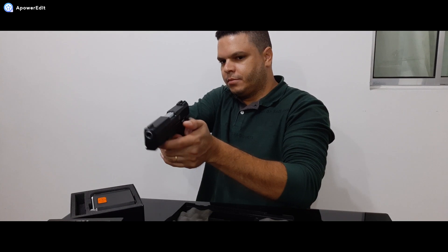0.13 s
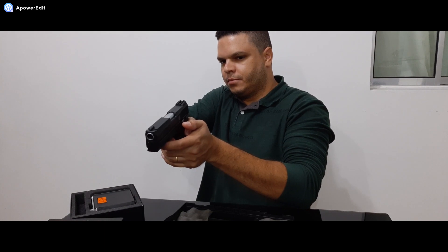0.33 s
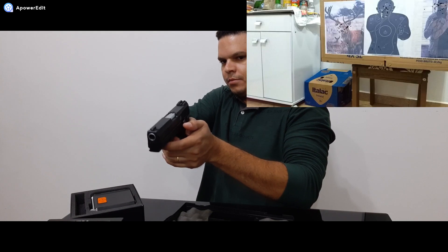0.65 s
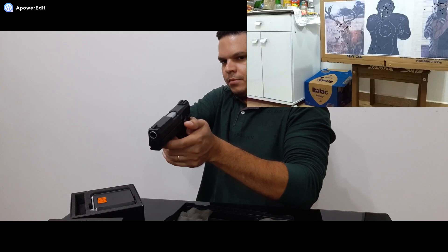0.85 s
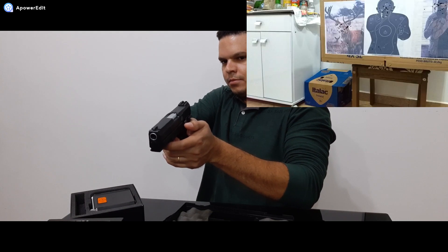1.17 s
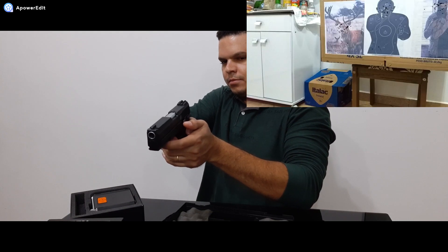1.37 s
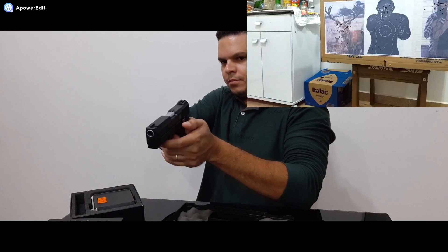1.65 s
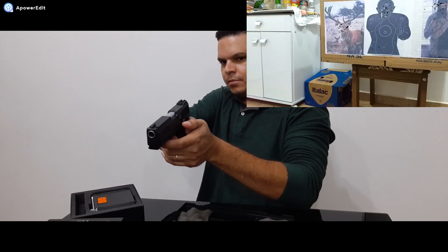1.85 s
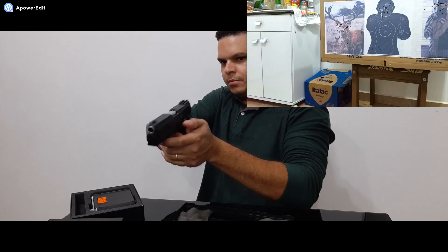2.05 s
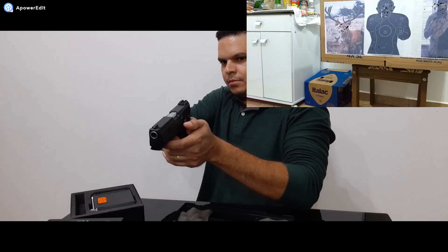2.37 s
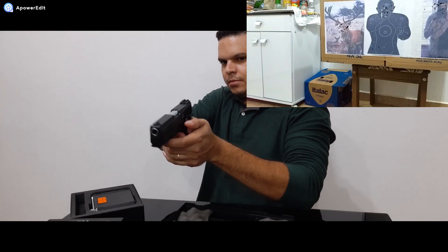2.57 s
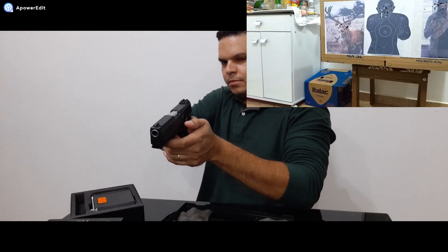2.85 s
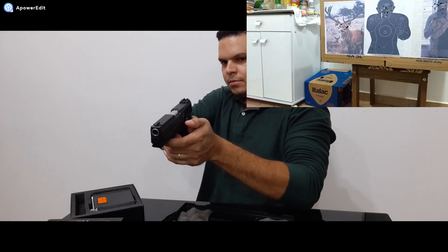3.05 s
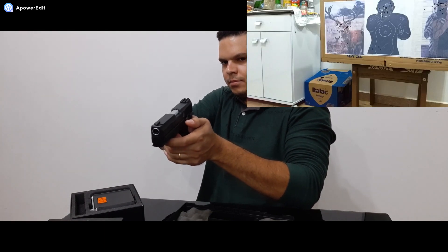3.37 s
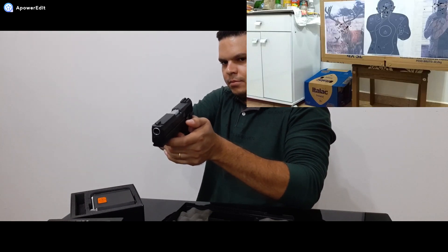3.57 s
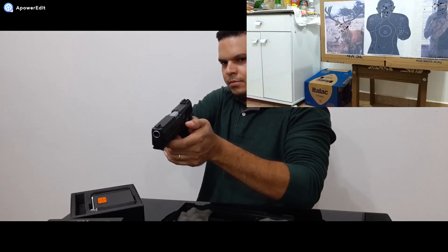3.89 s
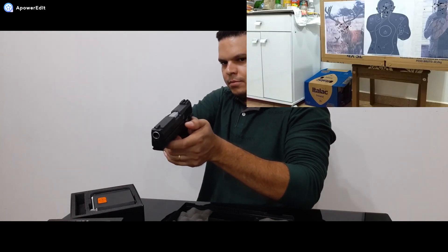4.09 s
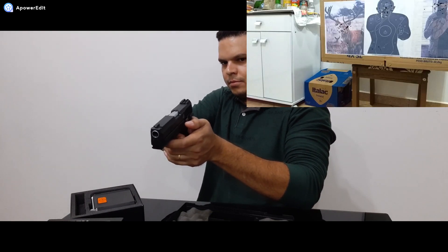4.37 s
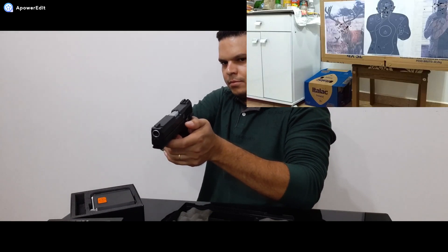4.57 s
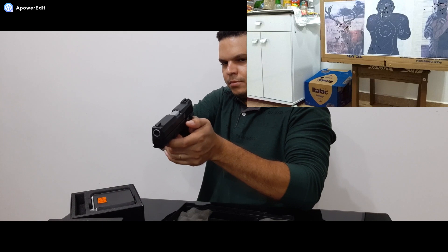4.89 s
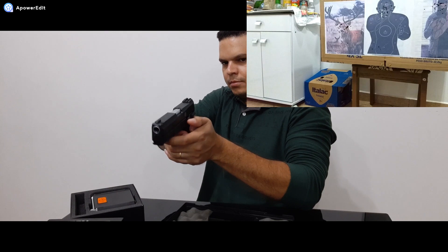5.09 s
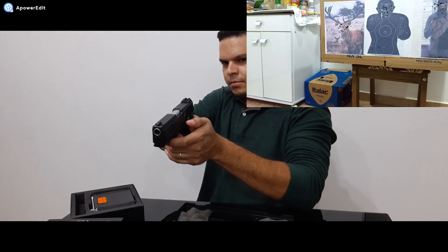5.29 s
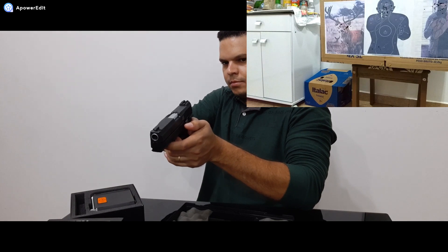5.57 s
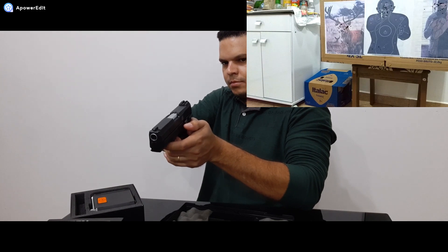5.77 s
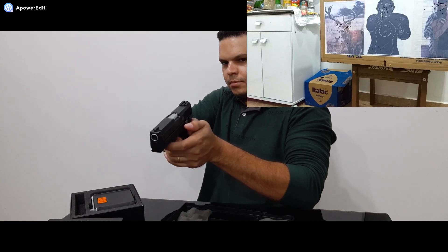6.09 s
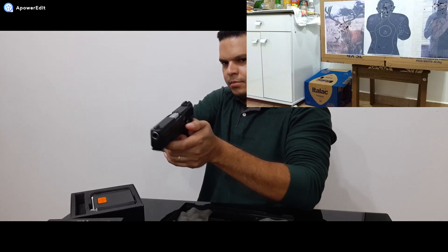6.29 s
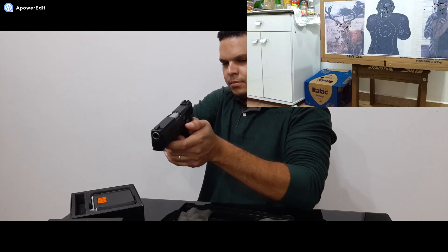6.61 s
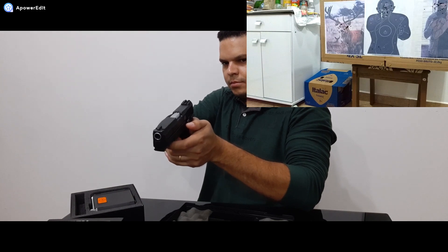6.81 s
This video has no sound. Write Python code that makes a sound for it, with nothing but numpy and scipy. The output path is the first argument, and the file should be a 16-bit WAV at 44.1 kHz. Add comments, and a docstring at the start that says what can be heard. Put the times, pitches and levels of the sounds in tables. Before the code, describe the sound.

Twelve sharp gas-pistol shots with metallic slide clash fired about twice a second in a small hard room, tiny trigger clicks between them.

```python
"""A small hard room hums faintly and still rings from a gas pistol shot fired before the start.
The trigger and sear tick close by, then the first of twelve shots goes off, with more ticks between them.
Each shot swells in faintly, then cracks as a burst of noise with a knock and a low push of air;
venting gas and the clash of the slide follow as shaped noise through narrow modes, and the room rings on.
Two microphones stand close; a look-ahead limiter and clipping squash the peaks, and a short fade ends it."""
import sys
import numpy as np
from scipy import signal
from scipy.fft import rfft, irfft
from scipy.io import wavfile
from scipy.ndimage import uniform_filter1d, minimum_filter1d

SR = 44100
rng = np.random.default_rng(int(sys.argv[2]) if len(sys.argv) > 2 else 0)


def unload_wav(signal):
    """Save mono or channel-first audio to the path in sys.argv[1] as 16-bit WAV at rate SR, clipped to [-1, 1]."""
    wavfile.write(
        sys.argv[1],
        SR,
        np.round(np.clip(np.atleast_2d(signal).T, -1, 1) * 32767).astype(np.int16),
    )


N = 306431
LEAD_S = 0.4  # the mix starts this long before the first sample that is kept

# Quiet of the room: (frequency [Hz], relative density [dB per Hz])
FLOOR_COLOUR = [(18, -47), (30, -18), (120, -4), (164, 0), (236, -6.5), (380, -13), (600, -9), (727, -13.5),
                (1470, -12.5), (1590, -19), (2240, -17.5), (5880, -27.5), (7300, -38.5), (7700, -24.5),
                (8200, -26.5), (15500, -34)]
FLOOR_DB = -58.5  # rms
# Faint hum: (frequency [Hz], level [dB rms])
HUM = [(119.5, -69.5), (241, -65.5), (542, -70.5), (1453, -78.5)]

# Shot before the start, of which only the tail is left: (time [s], room tail level [dB])
EARLIER_SHOT = (-0.29, -6.5)
# Colour of the room tail: (frequency [Hz], level [dB])
ROOM_COLOUR = [(24, -54.5), (40, -31.5), (120, -6), (294, -1.5), (386, -7), (496, 0), (636, -2.5),
               (2210, -2), (3060, -3), (7140, 4.5), (11200, 2.5), (15500, -16)]
# Decay of the room before a tail stretches it: (frequency [Hz], t60 [s])
ROOM_T60 = [(60, 0.088), (160, 0.62), (420, 0.79), (1100, 0.83), (2500, 0.71), (6000, 0.55), (10000, 0.41),
            (15000, 0.32)]
# Likeness of the room at the two microphones: (frequency [Hz], correlation [-1 to 1])
ROOM_LIKENESS = [(60, 0.27), (160, 1), (450, 0.66), (1200, -0.17), (3300, 0.12), (5500, -0.27),
                 (7000, 0.88), (15000, 0.96)]
# Lean of the room to one microphone: (frequency [Hz], left minus right [dB])
ROOM_BALANCE = [(60, -1.5), (240, 0.5), (950, 0.5), (3770, -0.5), (15000, -0.5)]
# Bands that stand out in the tail: (frequency [Hz], width [Hz], level [dB])
ROOM_BANDS = [(2050, 510, -0.5), (4190, 120, 4.5)]
# Low modes of room and furniture: (cluster centre [Hz], relative level [dB], t60 [s])
ROOM_MODES = [(137.2, 2, 0.61), (245.3, 0, 0.6), (307.7, 4.5, 0.41), (496, 2.5, 0.44), (590, 4.5, 0.5),
              (690, 4, 0.4), (832, 1, 0.41), (948, 7, 0.24), (1060, 6, 0.3), (1390, 0, 0.45)]
MODE_CLUSTER_HZ = 14  # each low mode is a cluster of neighbours, up to this far off, that beat
ROOM_HOLD_S = 0.032  # the tail holds before it falls
ROOM_LUMPS_DB = 1.4  # uneven reflections
BLOOM_S = 0.033  # the low-mid change of a tail comes in over this time
ROOM_TINT = 0.58  # share of a shot's colour that its room tail keeps
SHOT_ROOM_DB = -5  # room tail of a shot
TICK_ROOM_DB, TICK_BODY_DB = -10.5, 3.5  # room tail of a tick, relative to its ring; its low-mid

# Trigger and sear ticks:
# (time [s], level of the tick [dB], soft ring relative to that [dB], pitch of the snap [Hz])
TICKS = [(.0988, -25.5, -6, 10000), (0.5631, -17.5, -11.5, 10500), (0.919, -29.5, -8.5, 9000),
         (0.9819, -25, -5.5, 9000), (1.4187, -23, -8, 9000), (1.521, -29.5, -7, 9000),
         (1.9806, -22, -7.5, 8200), (2.0062, -21, -10, 10500), (2.6004, -20.5, -2, 6500),
         (2.934, -20, -16, 10100), (2.9982, -25, -6, 9000), (3.1925, -32, -1.5, 6540),
         (3.5585, -23, -8.5, 9100), (3.661, -31, -6, 9000), (4.7839, -20, -12.5, 8450),
         (4.8727, -32, -2.5, 9150), (5.1202, -23, -7.5, 8000), (5.5515, -34, -18, 9500),
         (5.6168, -39, -15, 9050), (6.6294, -34, -12, 8940)]
# Colour of the soft ring: (frequency [Hz], level [dB])
TICK_COLOUR = [(290, -37.5), (500, -17.5), (1740, -7), (2500, -2.5), (3840, -5), (7220, -8), (10200, -5.5),
               (15500, -18.5)]
# The soft ring creeps in and fades: (start [s], rise [s], hold [s], t60 [s])
TICK_RING = (-.0025, 0.003, 0, .07)
SNAP_T60, BOUNCE_S, BOUNCE_DB = 0.0018, 0.0005, -8  # ring s, mean gap s, dB a bounce

# Shots, levels before their colour is changed:
# (time of the break [s], crack [dB], push left [dB], push right [dB],
#  clash swells left after the break [s], clash swells right after the break [s],
#  knock band [dB], ring band [dB], treble [dB], low-mid of the room tail [dB])
SHOTS = [(0.193, 2, -2, 6, 0.0032, 0.0056, 3, 2, -3, -0.5),
         (0.6439, -0.5, -20, -5.5, 0.021, 0.017, -1.5, 3.5, 1, -0.8),
         (1.137, 8, 9, 6.5, 0.015, 0.01, 4, 1, 0.5, -1),
         (1.619, 0, -11.5, -3.5, 0.02, 0.018, -1, 3, 0.5, 1),
         (2.1005, 9, 4.5, -11, 0.0053, 0.026, 4, 0.5, -1.8, 0.2),
         (2.6168, 1.5, -9, -10.5, 0.019, 0.02, -2.5, 1.7, -1, -5),
         (3.235, 2, 5, -8, 0.0057, 0.026, 1.4, -0.5, -2.5, 1),
         (3.7151, -0.5, 0, -9.5, 0.013, 0.014, -1, 3, 0, 3),
         (4.5015, 2, -2, -6, 0.018, 0.019, 0, -1.5, -3, 0.5),
         (5.1618, 4, 1, -2, 0.0082, 0.0046, -1, 9.5, 0.2, -2.5),
         (6.3507, 14.5, 13, 11, 0.0037, 0.0046, 2, 2, -0.9, -1),
         (6.74, 5, 7.5, -13, 0.0094, 0.0051, 2, 2, -3, -1)]
SHOT_LEAD_S = 0.015  # a shot is computed from this long ahead of the break
# Bands that vary from shot to shot: (frequency [Hz], width [Hz])
KNOCK_BAND, RING_BAND, TREBLE_EDGE = (1580, 530), (5800, 540), (8700, 280)
# Faint noise swelling just ahead of the crack: (start [s], rise [s], hold [s], t60 [s])
LEAD_IN = (-.0024, .0018, .0005, .01)
LEAD_IN_DB = -17  # relative to the crack
# Crack at the muzzle: (start [s], rise [s], hold [s], t60 [s])
CRACK = (-0.0006, 0.00147, 0.00153, 0.018)
# Colour of the crack: (frequency [Hz], level [dB])
CRACK_COLOUR = [(180, -10), (450, 1.5), (1510, -4.5), (4950, 1.5), (10400, -0.5), (15500, -10)]
# Likeness of the crack at the two microphones: (frequency [Hz], correlation [-1 to 1])
CRACK_LIKENESS = [(300, 0.49), (2000, 0.71), (5000, 0.3), (12000, 0.36)]
CRACK_RING = 1  # how strongly the crack rings the modes of the slide
MIC_LAG = 6  # samples by which crack, knock and push reach the right microphone later
# Hammer knocking the frame: (frequency [Hz], level relative to the crack [dB], t60 [s])
KNOCK = (1300, -6, 0.014)
# A short dip of suction after the push, then an echo: (delay [s], factor)
PUSH_REPEATS = [(.0058, -0.21), (0.038, .17)]
# Venting gas: (start [s], rise [s], hold [s], t60 [s])
VENT = (0.0067, 0.0036, 0.0039, .04)
VENT_DB, SLIDE_DB = -3, 10.5
SLIDE_RISE, SLIDE_HOLD_S, SLIDE_T60 = 0.007, 0.016, 0.055  # slide runs back: s, s, s before the sag
SLIDE_SAG_DB_PER_S = 120.5  # further fall of the clash
# Narrow modes of the slide, before each shot scatters them: (frequency [Hz], width [Hz], level [dB])
SLIDE_MODES = [(1399, 30, -7), (2087, 46, -8.5), (4150, 100, -12.5), (5630, 24, -7.5), (5990, 45, 2),
               (6240, 47, 3), (6700, 41, 3), (7160, 65, 1), (7800, 67, -4), (7970, 42, -4.5),
               (9000, 54, 5.5), (9300, 40, -1), (9780, 90, -1.5), (11120, 190, 0.5)]
# Colour of vent and clash: (frequency [Hz], level [dB])
JET_COLOUR = [(100, -25), (386, -16.5), (682, -4.5), (1100, -7.5), (2080, -3), (2980, -4), (4270, -1),
              (5390, -7.5), (5860, -0.5), (7080, -2), (10800, -5), (15500, -16.5)]
# Likeness of vent, clash and tick ring at the two microphones: (frequency [Hz], correlation [-1 to 1])
JET_LIKENESS = [(60, 0.58), (740, 0.22), (1300, 0.26), (3300, -0.49), (5500, 0.12), (7000, 0.94),
                (15000, 0.18)]
RATTLE_DB, CLATTER_DB = 2.5, 5.0  # loose metal parts chatter slowly and clatter in fine impacts

EDGE_HZ = 15600  # upper band limit


def gain_of(db):
    """Decibels to a factor."""
    return 10 ** (np.asarray(db) / 20)


def evened(x):
    """Scales to rms 1."""
    return x / np.sqrt(np.mean(x ** 2) + 1e-20)


def read(points, hz):
    """Reads a table on a log-frequency axis."""
    f, value = np.transpose(points)
    return np.interp(np.log(hz + 1), np.log(f + 1), value)[:, None]


def add(mix, s, sound):
    """Mixes a sound in at s seconds, cut off at the end."""
    part = mix[..., round((s + LEAD_S) * SR):][..., :sound.shape[-1]]
    part += sound[..., :part.shape[-1]]


def noise_pair(size, colour, likeness, t60=None, balance=((0, 0), (1, 0)), hold=0, order=9):
    """Coloured noise at two microphones, alike band by band; with t60, a lumpy tail that dies away."""
    width = 2 ** order
    hop = width // 4
    frames = 4 * size // width + 6
    hz = np.fft.rfftfreq(width, 1 / SR)
    a, b, c, d = rng.standard_normal((frames, len(hz), 4)).T
    like = np.clip(read(likeness, hz), -1, 1)
    tilt = gain_of(read(balance, hz) / 2)
    left = a + 1j * b
    right = like * left + np.sqrt(1 - like ** 2) * (c + 1j * d)
    z = np.array([left * tilt, right / tilt])
    z *= gain_of(read(colour, hz))
    if t60:
        lumps = uniform_filter1d(rng.standard_normal((frames, len(hz))).T, size=5, axis=0)
        lumps = uniform_filter1d(lumps, size=6, axis=1)
        z *= gain_of(ROOM_LUMPS_DB * evened(lumps))
        falling = np.maximum(np.arange(frames) * hop / SR - hold, 0)
        z *= gain_of(-60 * falling / np.maximum(read(t60, hz), 0.05))
    return evened(signal.istft(z, nperseg=width, noverlap=width - hop)[1][:, :size])


def stage(t, start, rise, hold, t60):
    """A smooth rise, a hold and an exponential fall."""
    up = np.clip((t - start) / rise, 0, 1) ** 2
    return up * gain_of(-60 * np.maximum(t - start - rise - hold, 0) / t60)


def ringing(x, modes, share):
    """Noise that also rings a set of narrow resonances, scaled to rms 1."""
    rung = np.zeros_like(x)
    for hz, width, db in modes:
        rung += gain_of(db) * signal.lfilter(*signal.iirpeak(hz, hz / width, SR), x)
    return evened(x + share * rung)


def tinted(x, knock_db, ring_db, treble_db):
    """Raises or lowers the knock band, the ring band and the treble."""
    hz = np.fft.rfftfreq(x.shape[-1], 1 / SR)
    knock, ring, treble = [(hz - f) / width for f, width in (KNOCK_BAND, RING_BAND, TREBLE_EDGE)]
    db = knock_db * np.exp(-knock ** 2) + ring_db * np.exp(-ring ** 2)
    db += treble_db * (1 + np.tanh(treble)) / 2
    return irfft(rfft(x) * gain_of(db), x.shape[-1])


def floor(size):
    """The quiet of the room: steady coloured noise with a faint hum of sines."""
    t = np.arange(size) / SR
    hum = sum(gain_of(db) * np.sqrt(2) * np.sin(2 * np.pi * (hz * t + rng.random())) for hz, db in HUM)
    return gain_of(FLOOR_DB) * noise_pair(size, FLOOR_COLOUR, ROOM_LIKENESS, order=11) + hum


def room_tail(stretch):
    """A dense tail that builds up over the first reflections and dies band by band."""
    t60 = [(hz, s * stretch) for hz, s in ROOM_T60]
    size = round(1.4 * SR)
    tail = noise_pair(size, ROOM_COLOUR, ROOM_LIKENESS, t60, ROOM_BALANCE, ROOM_HOLD_S, order=10)
    tail = ringing(tail, ROOM_BANDS, 0.36)
    tail /= np.sqrt(np.mean(tail[:, 1500:4500] ** 2))  # level set by the early part
    return tail * np.clip(np.arange(size) / SR / 0.014, 0, 1) ** 6.9


def room_modes(t):
    """The lowest modes of the room and its furniture, alike at both microphones, struck anew by each sound."""
    hz, db, t60 = np.transpose(ROOM_MODES * 3)[..., None]  # three neighbours a cluster
    hz = hz + MODE_CLUSTER_HZ * rng.uniform(-1, 1, hz.shape)
    modes = gain_of(db - 60 * t / t60) * np.sin(2 * np.pi * (hz * t + rng.random(hz.shape)))
    return gain_of(-24.5) * modes.sum(axis=0) * np.clip(t / 0.04, 0, 1)


def add_room(mix):
    """The room answers the earlier shot, every shot and every tick with a dying blend of tails."""
    # adjoining rooms last longer
    tails = np.array([room_tail(0.76) + gain_of(-8.5) * room_tail(1.635) for _ in range(5)])
    since = np.arange(tails.shape[-1]) / SR
    due = [(*EARLIER_SHOT, 0, 0, 0, 0)]
    due += [(row[0], SHOT_ROOM_DB, *row[-4:]) for row in SHOTS]
    due += [(s, db + ring_db + TICK_ROOM_DB, 0, 0, 0, TICK_BODY_DB) for s, db, ring_db, _ in TICKS]
    blends = rng.standard_normal((len(due), len(tails)))  # random blend of the tails for each sound
    low_mid = signal.butter(1, (350, 1300), "bandpass", fs=SR)
    bloom = np.minimum(since / BLOOM_S, 1)
    for (s, room_db, *tint_db, body_db), blend in zip(due, blends):
        tail = np.tensordot(blend / np.linalg.norm(blend), tails, axes=1) + room_modes(since)
        if any(tint_db):
            tail = tinted(tail, *ROOM_TINT * np.array(tint_db))
        body = (gain_of(body_db) - 1) * bloom * signal.lfilter(*low_mid, tail)
        add(mix, s, gain_of(room_db) * (tail + body))


def snap(t, hz):
    """A small metal part clicks brightly, then bounces three times, weaker and unevenly spaced."""
    late = t - BOUNCE_S * (np.arange(4) + rng.uniform(-0.18, 0.2, 4))[:, None]
    rings = (late > 0) * gain_of(-60 * np.abs(late) / SNAP_T60) * np.sin(2 * np.pi * hz * late)
    return gain_of(BOUNCE_DB * np.arange(4)) @ rings


def tick(t, db, ring_db, hz):
    """Trigger or sear: the snap over a soft ring of coloured noise."""
    ring = gain_of(ring_db) * stage(t, *TICK_RING) * noise_pair(len(t), TICK_COLOUR, JET_LIKENESS)
    return gain_of(db) * (2 * snap(t, hz) + ring)


def muzzle_crack(t, crack_db, modes):
    """The muzzle's burst and the faint swell ahead of it share one noise that rings the slide."""
    noise = ringing(noise_pair(len(t), CRACK_COLOUR, CRACK_LIKENESS), modes, CRACK_RING)
    return noise * gain_of(crack_db) * (stage(t, *CRACK) + gain_of(LEAD_IN_DB) * stage(t, *LEAD_IN))


def hammer_knock(t, crack_db):
    """The hammer knocks the frame, a dying sine."""
    hz, db, t60 = KNOCK
    return gain_of(crack_db + db) * stage(t, 0, 0.00081, 0.0013, t60) * np.sin(2 * np.pi * hz * t)


def push(t):
    """A hump of overpressure, a short dip within a long shallow suction, and an echo of the hump."""
    hump = np.exp(-((t - 0.0038) / 0.00081) ** 2)
    u = np.maximum(t - 0.004, 0) / 0.0071
    wave = hump - 0.08 * u * np.exp(1 - u)
    return wave + sum(k * np.roll(hump, round(s * SR)) for s, k in PUSH_REPEATS)


def vent_and_slide(t, swell_left, swell_right, modes):
    """Venting gas and slide clash, summed in power, shape one clattering noise that rings the slide."""
    swells = np.array([[swell_left], [swell_right]])
    clash = stage(t, swells, SLIDE_RISE, SLIDE_HOLD_S, SLIDE_T60)
    clash *= gain_of(-SLIDE_SAG_DB_PER_S * np.maximum(t - (swell_left + swell_right) / 2, 0))
    shape = np.hypot(gain_of(VENT_DB) * stage(t, *VENT), gain_of(SLIDE_DB) * clash)
    rattle = gain_of(RATTLE_DB * evened(uniform_filter1d(rng.standard_normal(len(t)), size=120)))
    clatter = gain_of(CLATTER_DB * evened(uniform_filter1d(rng.standard_normal(len(t)), size=14)))
    noise = ringing(clatter * noise_pair(len(t), JET_COLOUR, JET_LIKENESS), modes, 0.98)
    return shape * rattle * noise


def shot(crack_db, push_left_db, push_right_db, swell_left, swell_right, *tint_db):
    """One shot as it reaches the microphones directly: crack, knock, push, vent and slide."""
    t = np.arange(6400) / SR - SHOT_LEAD_S
    # the pitch and level of each mode are drawn at random for every shot
    modes = np.array(SLIDE_MODES) + rng.standard_normal((len(SLIDE_MODES), 3)) * [25, 0, 3.5]
    crack = muzzle_crack(t, crack_db, modes) + hammer_knock(t, crack_db)
    crack = tinted(crack, *tint_db) + gain_of([[push_left_db], [push_right_db]]) * push(t)
    jet = vent_and_slide(t, swell_left, swell_right, modes)
    return tinted(jet, *tint_db) + [crack[0], np.roll(crack[1], MIC_LAG)]


def scene():
    """Ticks and shots, direct and through the room, over the floor."""
    mix = floor(N + round(LEAD_S * SR))
    add_room(mix)
    t = np.arange(2048) / SR - 0.004  # the soft ring of a tick starts early
    for s, *settings in TICKS:
        add(mix, s + t[0], tick(t, *settings))
    for s, *levels, _ in SHOTS:
        add(mix, s - SHOT_LEAD_S, shot(*levels))
    return mix[:, -N:]


def record(dry):
    """A limiter that ducks ahead of peaks, a slower second stage, clipping, a fade-out, the band limit."""
    power = abs(uniform_filter1d((dry ** 2).mean(0), round(0.0027 * SR)))
    power_db = 10 * np.log10(power + 1e-12)
    ahead = -minimum_filter1d(-power_db, round(2 * 0.0087 * SR))  # highest level 8.7 ms either way
    fall = np.arange(N) * 890.0 / SR  # the level it follows falls by at most 890 dB a second
    followed_db = np.maximum.accumulate(ahead + fall) - fall
    duck_db = np.clip(0.26 * (followed_db + 17), 0, 12.0)
    slow = np.arange(N) * 71.0 / SR  # the second stage lets go at 71 dB a second
    held_db = np.clip(uniform_filter1d(power_db, round(0.017 * SR), origin=200) + 6, 0, 4.5)
    duck_db += np.maximum.accumulate(held_db + slow) - slow
    ducked = dry / gain_of(uniform_filter1d(duck_db, round(0.0046 * SR)))
    fade = np.clip((N - np.arange(N)) / SR / 0.0077, 0.2, 1)
    clipped = np.clip(ducked, -0.95, 0.95) * fade
    low_pass = signal.firwin(511, EDGE_HZ, window=("kaiser", 9), fs=SR)
    return signal.oaconvolve(clipped, low_pass[None], "same")


dry = scene()
out = record(dry)
unload_wav(out)
```